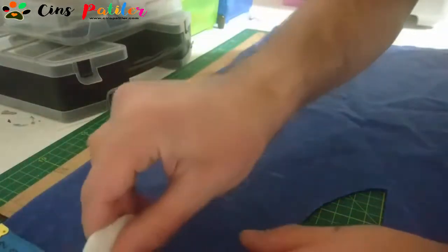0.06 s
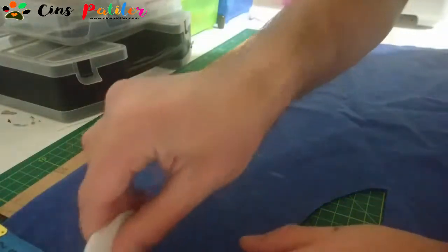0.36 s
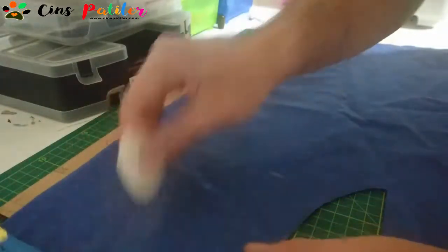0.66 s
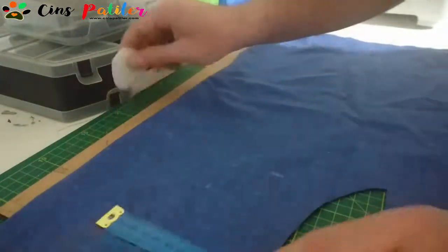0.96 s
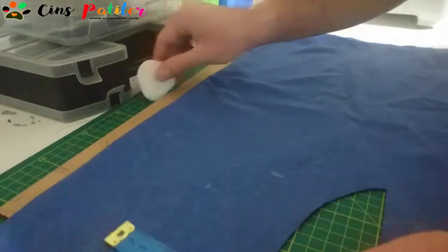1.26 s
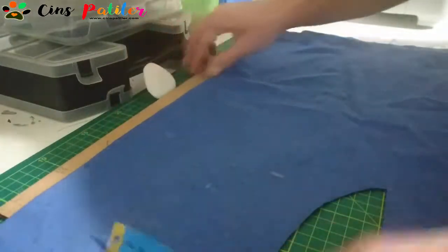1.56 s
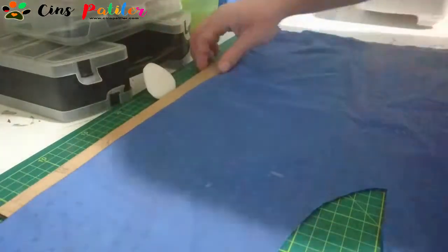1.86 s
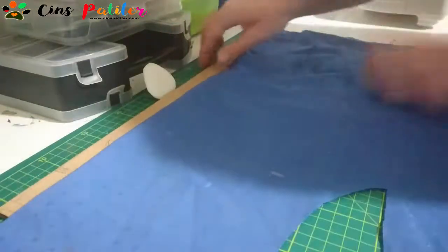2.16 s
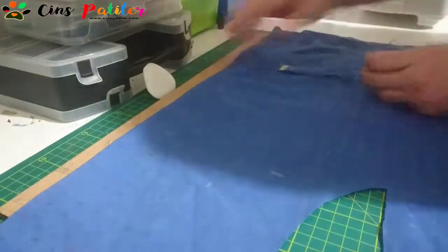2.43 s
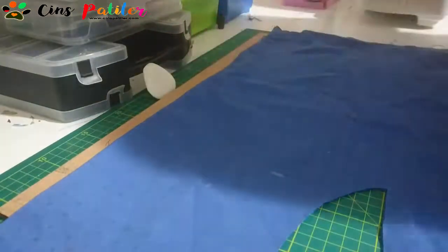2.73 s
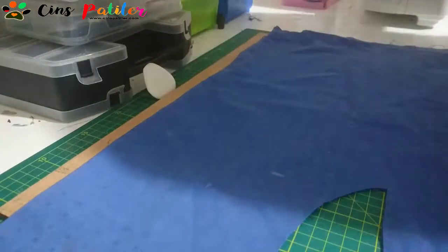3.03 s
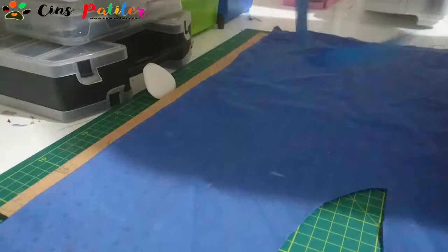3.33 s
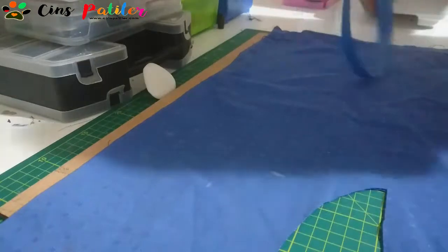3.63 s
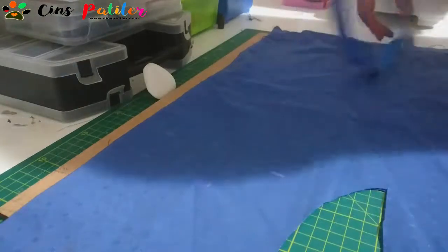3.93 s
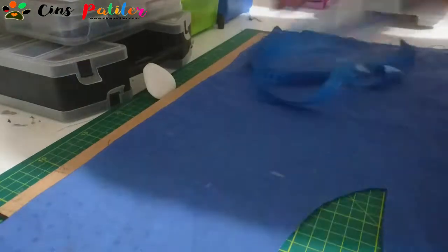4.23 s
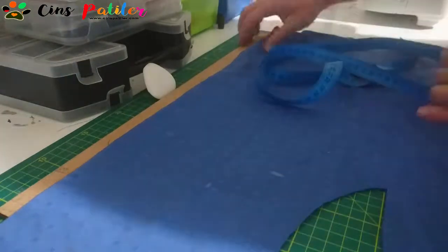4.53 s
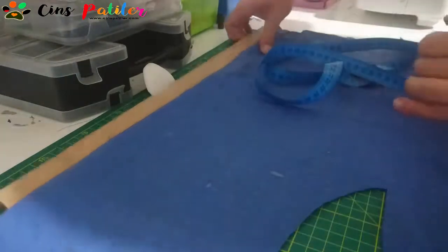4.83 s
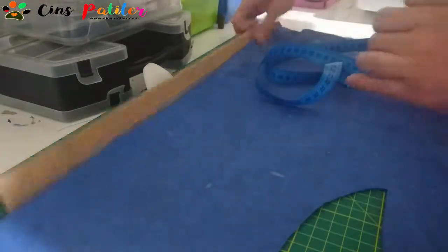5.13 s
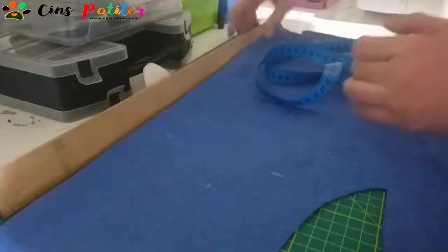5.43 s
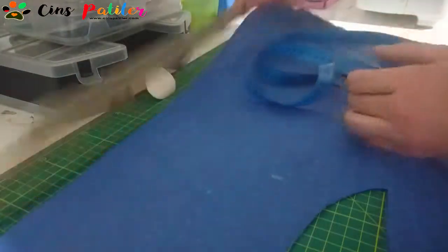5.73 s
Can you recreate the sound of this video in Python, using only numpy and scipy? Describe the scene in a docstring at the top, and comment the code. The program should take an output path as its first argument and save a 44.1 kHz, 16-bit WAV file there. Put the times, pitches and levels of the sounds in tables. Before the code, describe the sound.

Close to the microphone in a small room with a faint electrical hum, sewing tools are handled on a cloth-covered table. Soft pats and the jerky rasp of a tape measure lead to a brief, bright clatter of chalk. Fingers and nails swish across fabric, and the tape flicks with dry clicks. Near the end a wooden ruler slides and strikes the table in a quick run of loud, hollow knocks.

```python
"""Sewing preparation on a cutting mat, close to a camera's stereo microphone in a small, quiet room with a
faint mains hum. Hands pat the table; a tape measure is dragged over cloth in jerks and dropped. Tailor's
chalk is put down and rattles to rest, then hands and nails brush the fabric and the flexing tape snaps.
Last, a long wooden ruler scrapes off the mat and knocks on the table as it is lifted: the top rings."""
import sys
import numpy as np
from scipy import signal
from scipy.fft import rfft, irfft, next_fast_len
from scipy.io import wavfile
from scipy.ndimage import uniform_filter1d, map_coordinates

SR = 44100
rng = np.random.default_rng(int(sys.argv[2]) if len(sys.argv) > 2 else 0)


def unload_wav(signal):
    """Save mono or channel-first audio to the path in sys.argv[1] as 16-bit WAV at rate SR, clipped to [-1, 1]."""
    wavfile.write(
        sys.argv[1],
        SR,
        np.round(np.clip(np.atleast_2d(signal).T, -1, 1) * 32767).astype(np.int16),
    )


N = 259306
TIME = np.arange(N) / SR
HIT_TIME = TIME[:2 ** 15]  # time axis of one contact and its decay
HIT_HZ = np.fft.rfftfreq(len(HIT_TIME), 1 / SR)

# ruler and table top ringing together: (frequency [Hz], level [dB], t60 [s])
TABLE_MODES = [(66.3, -21, 0.43), (94, -5, 0.11), (104.4, 4, 0.15), (151.8, -2.5, 0.36), (257, -12, 0.13),
               (293, -4, 0.216), (358, 3.5, 0.055), (368, -36, .15), (473, -12.5, 0.2), (655, -7, 0.19),
               (855, -8.5, 0.012), (990, -20, 0.088), (1400, -3.5, 0.02), (1493, -1.5, 0.046),
               (1816, -35, 0.78)]


def ruler():
    """The ruler slides, then slaps the table edge first: the strip cracks and the top rings under it."""
    # the slide along the mat: (peak time [s], level [dB], rise [s], fade [s])
    slide = [(5.075, -40, 0.13, 0.067)]
    # wood rubbing on the mat: (frequency [Hz], level [dB])
    slide_colour = [(35, -44), (60, -14), (317, 1.5), (780, -4.5), (1050, -0.5), (1240, -11), (1390, -0.5),
                    (1630, -12), (4510, -19), (8420, -31.5), (13100, -51), (15000, -81)]
    # blows on the table: (time [s], level [dB], bass [dB], hollow middle [dB], treble [dB], crack [dB])
    knocks = [(5.1744, -25.5, 3.5, 1, -14, -50), (5.2642, -18, -5, 2.5, -24, -46),
              (5.3743, -17, -3.5, 0, -13, -39), (5.402, -21.5, -11, 0.5, -28, -59)]
    # spectrum of a blow: (frequency [Hz], level [dB])
    knock_colour = [(30, -13), (100, -13), (200, 3.5), (310, 8.5), (450, 1), (700, 2), (1000, 3.5),
                    (1450, 4), (2100, -3), (3500, 0.5), (4800, -14), (6100, -12.5), (10000, -22.5),
                    (16000, -37)]
    # the hard strip's own crack: (frequency [Hz], level [dB], t60 [s])
    crack_modes = [(3250, 1, 0.012), (3400, -12, 0.013), (3860, -1, 0.016), (6170, -9, 0.005),
                   (7440, -16, 0.004)]
    edge_lead_s, lowest_hz = 0.001208, 57.4  # the edge lands first; the deepest bass is cut from the blows
    out = strokes(slide) * friction(slide_colour, grain_db=1.5, grain_rate=600)
    for s, db, bass_db, hollow_db, treble_db, crack_db in knocks:
        colour = reshaped(knock_colour, [(310, 0), (450, hollow_db), (700, hollow_db), (1000, 0)])
        blow = pulse(colour, bass_db + 8.5, treble_db + 8.5)
        blow += amp(crack_db) * ring(crack_modes, scatter_db=4)
        slap = placed(blow, lead_ms=0.275, pan_db=-1.5, near_db=2.5, near_t60=0.018, room_db=-2)
        top = ring(TABLE_MODES, scatter_db=1)
        body = placed(top, lead_ms=0.096, pan_db=1.4, near_db=-1.5, near_t60=0.013, room_db=-28)
        edge = placed(blow, lead_ms=0.53, pan_db=0, near_db=9.5, near_t60=0.0083, room_db=-12)
        add(out, s - edge_lead_s, amp(db + 10) * edge)
        add(out, s, amp(db + 23) * slap + amp(db + bass_db - 9.5) * body)
    return signal.sosfilt(signal.butter(3, lowest_hz, "high", fs=SR, output="sos"), out)


def ruler_click():
    """The ruler's thin corner snaps off the mat with a dry, bright click."""
    # the corner lets go: (time [s], level [dB])
    clicks = [(5.0854, -24.5)]
    # its resonances: (frequency [Hz], level [dB], t60 [s])
    corner_modes = [(1760, -3.5, 0.0055), (3120, 1.5, 0.0023), (3800, -2.5, 0.01), (4520, -4.5, 0.0095),
                    (6000, -8, 0.0055), (8360, -13, 0.0036), (12000, -18, 0.0031)]
    out = np.zeros((2, N))
    for s, db in clicks:
        corner = ring(corner_modes, scatter_db=1.5)
        click = placed(corner, lead_ms=0.33, pan_db=3, near_db=-1, near_t60=0.033, room_db=-2.5)
        add(out, s, amp(db - 5.5) * click)
    return out


def ruler_drag():
    """Dry friction keeps the wooden strip ringing in its bending modes."""
    # its end drags: (peak time [s], level [dB], rise [s], fade [s])
    drags = [(5.58, -49, 0.03, 0.05), (5.695, -63.5, 0.56, 0.32)]
    # bending modes: (frequency [Hz], width [Hz], level [dB])
    bending_modes = [(632, 38, 0), (1310, 40, -18), (1868, 18, 1.5), (2550, 32, -4.5), (3100, 140, -14),
                     (3820, 58, -18), (4230, 82, -16), (4870, 71, -15), (6000, 300, -19)]

    def wood(hz):
        modes = sum((-1) ** k * amp(db) * 1j * hz * width / (centre ** 2 - hz ** 2 + 1j * hz * width)
                    for k, (centre, width, db) in enumerate(bending_modes))
        return modes / (1 + (hz / 8000) ** 4)
    slips = diffuse(N) * amp(3 * wobble(120))
    return strokes(drags) * unit(filtered(slips, wood))


def light_taps():
    """Tape, fingers and tools touch the cloth-covered table: each rings hollow and stirs the top."""
    # contacts: (time [s], level [dB], bass [dB], treble [dB], left over right [dB], resonance [Hz])
    taps = [(0.632, -57, -11, -15, 0, 1410), (0.957, -46, -26, -8.5, 14, 1330),
            (0.967, -43, 2, -8, 1, 1370), (1.029, -45.5, 2, -11, 4, 1440), (1.050, -58, 9, 2.5, -5, 1570),
            (1.122, -43, -19, -13, 1, 1640), (1.2206, -27, -4.5, -14.5, 4, 1360),
            (1.338, -53.5, -15, -4, 10, 4000), (1.796, -50.5, -8, -1, -3, 1490),
            (1.802, -44.5, -21, -6.5, 9, 1230), (1.921, -53, -1, -33, -7, 900),
            (2.112, -37, 2.5, -17, 3, 2520), (2.64, -58, -3, 1.5, -2, 1390),
            (3.4466, -45, -5, -2.5, 7, 1590), (3.593, -54, 0, 0, 4, 1680),
            (3.655, -56.5, -13, -7.5, 7, 1570), (3.881, -53.5, 2, -36, 3, 600),
            (4.0415, -51.5, 10.5, -10, 0, 1410), (4.3326, -34, -2, -12, -1.5, 1670),
            (4.4403, -45.5, 5, -7.5, -2, 488), (4.6578, -45, 8.5, -11, 3, 806),
            (4.687, -50, 8.5, -7, -2, 2600), (5.534, -45, -2, -6.5, 2, 4000)]
    # spectrum of a contact: (frequency [Hz], level [dB])
    tap_colour = [(30, -4), (120, -25.5), (300, 5.5), (600, 1.5), (1000, 0.5), (1600, -5), (2400, -5),
                  (4200, -0.5), (6000, -12.5), (10000, -16), (16000, -45)]
    out = np.zeros((2, N))
    for s, db, bass_db, treble_db, pan_db, hz in taps:
        contact = pulse(tap_colour, bass_db + 5.5, treble_db + 0.5)
        hollow = resonant(contact, hz, sharpness=1.96, boost_db=2.5)
        tap = placed(hollow, lead_ms=0.086, pan_db=pan_db, near_db=4, near_t60=0.027, room_db=4.5)
        add(out, s, amp(db + 19) * tap)
        add(out, s, amp(db + bass_db - 20.5) * ring(TABLE_MODES, scatter_db=1.5))
    return out


def chalk():
    """The hard chalk wafer pings at each bounce and knocks on what it leans against."""
    # it rocks to rest: (time [s], level [dB], knock [dB])
    bounces = [(1.3834, -28.5, -7.5), (1.3999, -29, -5), (1.422, -31, -12.5), (1.446, -53, -19),
               (1.4543, -41.5, -5), (1.4633, -49.5, 2)]
    # the wafer's resonances: (frequency [Hz], level [dB], t60 [s])
    wafer_modes = [(2470, -16.5, 0.034), (3630, -7, 0.014), (4210, -0.5, 0.038), (4240, -6, 0.028),
                   (4380, -19, 0.016), (6820, -20, .016), (8100, -17, 0.04), (8700, -27, 0.066),
                   (12900, -29, 0.033)]
    # spectrum of its knock: (frequency [Hz], level [dB])
    knock_colour = [(60, -42), (300, 8.5), (520, 1.5), (760, 10), (1100, 2), (1700, -0.5), (2400, -5),
                    (4000, -4), (5400, -15), (7000, -13.5), (9000, -14), (16000, -27)]
    out = np.zeros((2, N))
    for s, db, knock_db in bounces:
        wafer = ring(wafer_modes, scatter_db=0.8, in_step=True) * onset(0.0004)
        ping = placed(wafer, lead_ms=0.34, pan_db=5.5, near_db=-9.5, near_t60=0.022, room_db=-11.5)
        knock = placed(pulse(knock_colour), lead_ms=0.17, pan_db=0.5, near_db=0, near_t60=0.066, room_db=-4)
        add(out, s, amp(db - 1.5) * ping + amp(db + knock_db + 25) * knock)
    return out


def hand_thuds():
    """Soft hands give the padded table a low push; a flat palm pushes deeper than a fingertip. The pat at 5.087
    s is the low thump under the ruler's corner click."""
    # pats: (time [s], level [dB], depth [dB])
    pats = [(0.32, -48.5, -25), (0.433, -45.5, -5), (0.533, -46, -14), (2.211, -47, 0), (2.272, -42, -24),
            (3.893, -51.5, -12), (4.445, -46.5, 1.5), (5.087, -36, -25), (5.535, -38.5, -1),
            (5.617, -34, -44), (5.669, -36.5, -39)]
    # spectrum of a pat: (frequency [Hz], level [dB])
    pat_colour = [(25, -19), (60, -7.5), (110, 10.5), (190, -0.5), (320, -7), (600, -24.5), (2000, -34),
                  (6000, -78), (16000, -110)]
    settle_s, settle_db = 0.027, -12  # the rest of the hand follows, more softly
    out = np.zeros((2, N))
    for s, db, depth_db in pats:
        push = pulse(reshaped(pat_colour, [(70, depth_db + 11.5), (150, 0)]))
        for delay, loss_db in ((0, 0), (settle_s, settle_db)):
            thud = placed(push, lead_ms=0, pan_db=1.5, near_db=4, near_t60=0.019, room_db=0.5)
            add(out, s + delay, amp(db + loss_db + 35) * thud)
    return out


def table_rumble():
    """A hand leans on the table and the loaded top shudders deep in the bass."""
    # the lean: (peak time [s], level [dB], rise [s], fade [s])
    lean = [(2.255, -51.5, 0.043, 0.17)]
    # spectrum of the shudder: (frequency [Hz], level [dB])
    shudder_colour = [(20, -30.5), (35, -13), (55, 16), (80, -25), (140, -24), (500, -70), (2000, -100)]
    return strokes(lean) * coloured(diffuse(N), shudder_colour)


def finger_squeak():
    """A fingertip sticks and slips on the ruler: an unsteady tone, strongest at its octave."""
    # squeaks that stop dead: (start [s], stop [s], level [dB], slip rate [Hz])
    squeaks = [(1.515, 1.522, -37.5, 939)]
    out = np.zeros((2, N))
    for start, stop, db, hz in squeaks:
        phase = 2 * np.pi * hz * TIME + .3 * wobble(350)
        swell = level([(start - .008, db - 20), (start, db - 3), (stop, db), (stop + .002, db - 40)])
        tone = swell * (amp(-8) * np.sin(phase) + np.sin(2 * phase))
        first = round((start - .01) * SR)
        burst = tone[first:first + len(HIT_TIME)]
        squeak = placed(burst, lead_ms=0.033, pan_db=2, near_db=-7, near_t60=0.015, room_db=-11.5)
        add(out, first / SR, squeak)
    return out


def tape_drag():
    """The stiff tape creeps over the cloth, with short jerks that swell and stop dead."""
    # the slow creep: (time [s], level [dB])
    creep = [(0.60, -90), (0.645, -70), (0.83, -67), (1.06, -78), (1.35, -66.5)]
    # its spectrum: (frequency [Hz], level [dB])
    creep_colour = [(200, -35), (1100, -14.5), (1400, -3), (1590, -8.5), (1900, -14.5), (3000, -27),
                    (6000, -42), (16000, -60)]
    # jerks: (start [s], stop [s], final level [dB], rise [dB], treble [dB], resonance [Hz])
    jerks = [(0.879, 0.945, -50, 17.5, 12, 1580), (1.121, 1.143, -54, -3, -1.5, 1570),
             (1.16, 1.219, -48.5, 33.5, -29, 1850), (1.48, 1.52, -37.5, 16.5, 2, 1700),
             (1.54, 1.583, -55, 11, 13, 1150)]
    # their spectrum: (frequency [Hz], level [dB])
    jerk_colour = [(60, -53), (300, -1), (800, 8), (1250, 9.5), (1560, 6), (1900, 4.5), (2250, 3),
                   (4000, -3.5), (6000, -11.5), (9000, -15.5), (16000, -37)]
    out = level(creep) * friction(creep_colour, grain_db=1, grain_rate=300)
    for start, stop, db, rise_db, treble_db, hz in jerks:
        swell = level([(start - .01, db - rise_db - 23), (start, db - rise_db), (stop - .005, db),
                       (stop + .011, db - 17.5), (stop + .18, db - 44)])
        rub = friction(jerk_colour, grain_db=1.5, grain_rate=600)
        rub = filtered(rub, lambda f: amp(along([(1900, 0), (3600, treble_db)], f)))
        out += swell * unit(resonant(rub, hz, sharpness=10, boost_db=8.5))
    return out


def tape_snaps():
    """The flexing tape flicks straight with a dry, bright snap."""
    # flicks: (time [s], level [dB], body [dB])
    flicks = [(3.4447, -34, -3), (4.0415, -52.5, 4), (4.043, -44.5, -11), (4.059, -60, -1),
              (4.291, -52, -6), (4.313, -46, 4)]
    # spectrum of a snap: (frequency [Hz], level [dB])
    snap_colour = [(60, -28), (300, 3.5), (700, -4), (1500, 0), (3300, -0.5), (4200, 4.5), (5200, -1.5),
                   (7000, -4.5), (9600, -4), (11000, -10.5), (13000, -8), (16000, -33)]
    out = np.zeros((2, N))
    for s, db, body_db in flicks:
        click = pulse(reshaped(snap_colour, [(2000, body_db), (5000, 0)]))
        snap = placed(click, lead_ms=0.018, pan_db=-2.5, near_db=3.5, near_t60=0.02, room_db=2.5)
        add(out, s, amp(db + 10) * snap)
    return out


def tape_chirps():
    """The tape catches on the cloth and one resonance rings: a short, soft-edged, hollow chirp."""
    # catches: (time [s], level [dB], pitch [Hz])
    catches = [(0.788, -55.5, 1580), (1.030, -50.5, 1590), (1.049, -55, 1600), (1.119, -44.5, 1594)]
    attack_s, t60 = 0.002, 0.027
    out = np.zeros((2, N))
    for s, db, hz in catches:
        tone = ring([(hz, 0, t60)], scatter_db=0.5) * onset(attack_s)
        chirp = placed(tone, lead_ms=0.067, pan_db=-5, near_db=-13, near_t60=0.024, room_db=-1)
        add(out, s, amp(db + 5) * chirp)
    return out


def fabric():
    """The weave hisses when brushed; hands rub more dully through it on the mat."""
    # light swishes: (peak time [s], level [dB], rise [s], fade [s])
    swishes = [(0.382, -65, 0.0073, 0.06), (0.635, -65, 0.015, 0.033), (0.79, -63.5, 0.22, 0.34),
               (1.19, -64, 0.081, 0.11), (1.62, -69, 0.37, 0.245), (1.74, -56, 0.052, 0.11),
               (1.805, -74, 0.02, 0.04), (1.86, -63.5, 0.12, 0.13), (2.08, -73, 0.94, 0.68),
               (3.6, -73, 0.24, 0.29), (4.225, -67.5, 0.039, 0.032), (4.29, -69.5, 0.15, 0.23),
               (4.70, -70.5, 0.025, 0.12), (4.84, -67, 0.021, 0.1), (5.078, -58.5, 0.047, 0.35),
               (5.58, -70, 0.068, 0.49)]
    # their spectrum: (frequency [Hz], level [dB])
    swish_colour = [(300, -42), (1800, -3.5), (2800, 1), (3600, 5), (4150, 7.5), (5000, 0.5), (8000, 4),
                    (11000, -6), (14000, -10), (16000, -36)]
    # spectrum of the broad brushes: (frequency [Hz], level [dB])
    brush_colour = [(300, -12), (1700, -10), (2800, -8), (4100, -3), (5500, -3.5), (8000, -2),
                    (11000, -5.5), (14000, -7), (16000, -15)]
    # hand rubs: (peak time [s], level [dB], rise [s], fade [s])
    rubs = [(1.18, -64, 0.38, 0.27), (1.485, -54, 0.5, 0.34), (2.22, -62, 1.24, 0.39),
            (3.63, -65, 0.43, 0.23), (4.47, -69, 0.45, 0.81), (4.72, -62, 0.27, 0.14),
            (5.19, -48, 0.42, 0.21), (5.31, -42, 0.12, 0.11), (5.54, -51.5, 0.16, 0.38),
            (5.63, -57, 0.046, 0.081), (5.69, -60, 0.054, 0.054)]
    # their spectrum: (frequency [Hz], level [dB])
    rub_colour = [(40, -12), (120, -2), (350, -1), (600, -6.5), (1200, -11.5), (2500, -19), (6000, -26.5),
                  (16000, -87)]
    swish = patchy(friction(swish_colour, grain_db=1.2, grain_rate=450), depth_db=.7)
    brush = patchy(friction(brush_colour, grain_db=2.6, grain_rate=500), depth_db=2.2)
    rub = friction(rub_colour, grain_db=3.5, grain_rate=100)
    return strokes(swishes) * swish + brush_gain() * brush + strokes(rubs) * rub


def brush_gain():
    """Gain per sample of broad brushes across the fabric: a quick attack, a steady swell, a release."""
    # brushes: (start [s], stop [s], final level [dB], rise [dB])
    brushes = [(2.667, 2.784, -54.5, 11), (2.825, 3.003, -59.5, 2)]
    attack_db_per_s, release_db_per_s = 448, 212
    gain = np.zeros(N)
    for start, stop, db, rise_db in brushes:
        swell_db = np.interp(TIME, [start, stop], [db - rise_db, db])
        attack_db = attack_db_per_s * np.maximum(start - TIME, 0)
        release_db = release_db_per_s * np.maximum(TIME - stop, 0)
        gain = np.maximum(gain, amp(swell_db - attack_db - release_db))
    return gain


def nail_zips():
    """Nails tick over the threads so fast that they rasp at a pitch, which glides with their speed."""
    # zips: (start [s], stop [s], level [dB], first pitch [Hz], last pitch [Hz])
    zips = [(2.656, 2.822, -64.5, 4340, 3770), (2.753, 2.822, -64.5, 3220, 2980),
            (2.85, 2.907, -70, 2870, 2680), (2.887, 2.94, -71, 3530, 3390), (2.907, 2.97, -65, 4260, 4270)]
    spread_hz, slip_db = 700, 1.5  # spread of the thread rate; depth of catch and slip
    out = np.zeros((2, N))
    for start, stop, db, first_hz, last_hz in zips:
        progress = np.clip((TIME - start) / (stop - start), 0, 1)
        phase = 2 * np.pi * np.cumsum(first_hz + (last_hz - first_hz) * progress) / SR
        uneven = filtered(diffuse(N), lambda hz: 1 / (1 + (hz / spread_hz) ** 2))
        rasp = unit(uneven * np.sin(phase) * amp(slip_db * wobble(250)))
        out += amp(db) * np.sin(np.pi * progress) * rasp
    return out


def room_tone():
    """The small room's still air and an unsteady mains hum."""
    # spectrum of the air: (frequency [Hz], level [dB])
    air_colour = [(12, -35), (20, -16), (49, -15), (119, -8), (219, -16.5), (393, -13.5), (597, -21),
                  (767, -18.5), (932, -24), (2600, -31), (4200, -36), (9390, -37.5), (10800, -44),
                  (12100, -39.5), (15500, -62)]
    # tones of the hum: (frequency [Hz], level [dB])
    hum_tones = [(118.4, -67.5), (393.0, -75), (484.5, -85.5)]
    air = coloured(diffuse(N), air_colour)
    hum = sum(amp(db + 1.5 * wobble(9)) * np.sqrt(2) * np.sin(2 * np.pi * hz * TIME + .6 * wobble(14))
              for hz, db in hum_tones)
    return amp(-67) * air + amp(-2.5) * hum


def placed(sound, lead_ms, pan_db, near_db, near_t60, room_db):
    """Direct sound at the microphone pair, scatter from boxes nearby, two walls, then the room's tail."""
    # first reflections off the walls: (delay [s], level [dB])
    reflections = [(0.017, -2), (0.0231, -4.5)]
    # the room's decay: (frequency [Hz], t60 [s])
    room_decay = [(100, 0.49), (400, 0.28), (1500, 0.23), (5000, 0.24), (14000, 0.37)]
    size = len(HIT_TIME)
    side = np.array([[.5], [-.5]])  # left, right
    delay_s = (abs(lead_ms) / 2 - side * lead_ms) / 1000
    direct = amp(side * pan_db) * np.exp(-2j * np.pi * HIT_HZ * delay_s)
    walls = sum(amp(db - 3) * np.exp(-2j * np.pi * HIT_HZ * delay) for delay, db in reflections)
    walls /= (1 + 1j * HIT_HZ / 500) ** 2  # cluttered walls mirror only the long waves
    near = diffuse(size) * amp(-60 * HIT_TIME / near_t60)
    near = signal.lfilter(*signal.butter(1, 500, "high", fs=SR), near)  # boxes scatter only short waves
    hz, t, spectra = signal.stft(diffuse(size), SR, nperseg=256)
    spectra *= amp(-60 * t / along(room_decay, hz)[:, None])
    tail = signal.istft(spectra, SR, nperseg=256)[1][:, :size] * onset(0.0014)
    echoes = (amp(near_db + side * pan_db) * unit(near) + amp(room_db) * unit(tail)) / np.sqrt(size)
    early = irfft(rfft(sound) * (direct + walls))
    return early + signal.fftconvolve(sound[None], echoes, axes=1)[:, :size]


def diffuse(size):
    """White noise from all sides: the two microphones agree only in the bass."""
    # likeness of left and right: (frequency [Hz], correlation [0-1])
    likeness = [(100, 0.81), (300, 0.86), (600, 0.22), (1200, 0.025), (3000, 0.022), (10000, 0.041)]

    def mid_and_side(hz):
        turn = np.arccos(np.clip(along(likeness, hz), -1, 1)) / 2
        return np.array([np.cos(turn), np.sin(turn)])
    mid, side = filtered(rng.standard_normal((2, size)), mid_and_side)
    return unit(np.array([mid + side, mid - side]))


def friction(colour, grain_db, grain_rate):
    """Rubbing noise of rms 1, broken into grains as fibres catch and slip."""
    return coloured(diffuse(N) * amp(grain_db * wobble(grain_rate)), colour)


def strokes(rows):
    """Gain per sample of rubbing strokes: each swells to its peak and dies away, and their powers add."""
    range_db = 23.5  # gained over the rise time, lost over the fade time
    power = np.zeros(N)
    for s, db, rise_s, fade_s in rows:
        away = np.maximum((s - TIME) / rise_s, (TIME - s) / fade_s)
        power += amp(db - range_db * away) ** 2
    return np.sqrt(power)


def patchy(x, depth_db):
    """Brief patches of colour, as folds of cloth open and close."""
    spectra = signal.stft(x, nperseg=512)[2]
    patches = uniform_filter1d(rng.standard_normal(spectra.shape[1:]), size=8, axis=0)
    patches = uniform_filter1d(patches, size=7, axis=1)
    return unit(signal.istft(spectra * amp(depth_db * unit(patches)), nperseg=512)[1][:, :N])


def pulse(colour, bass_db=0, treble_db=0):
    """A minimum-phase contact pulse: heavier blows hold more bass, harder ones more treble."""
    shelves = [(280, bass_db), (650, 0), (1900, 0), (3600, treble_db)]
    cepstrum = irfft(np.log(amp(along(colour, HIT_HZ) + along(shelves, HIT_HZ))))
    half = len(cepstrum) // 2
    cepstrum[1:half] *= 2
    cepstrum[half + 1:] = 0
    return irfft(np.exp(rfft(cepstrum)))


def ring(modes, scatter_db, in_step=False):
    """Damped modes, struck at new strengths each time; starting in step gives a sharper attack."""
    sign = 1 if in_step else -1
    out = np.zeros(len(HIT_TIME))
    for k, (hz, db, t60) in enumerate(modes):
        decay = amp(db + scatter_db * rng.standard_normal() - 60 * HIT_TIME / t60)
        out += sign ** k * decay * np.sin(2 * np.pi * hz * HIT_TIME)
    return out


def resonant(x, hz, sharpness, boost_db):
    """x with one ringing resonance added."""
    return x + amp(boost_db) * signal.lfilter(*signal.iirpeak(hz, sharpness, SR), x)


def balanced(x, balance):
    """Share each frequency's power between the two sides by (Hz, left over right dB) points."""
    def gains(hz):
        pair = amp(np.array([[.5], [-.5]]) * along(balance, hz))
        return pair / np.sqrt(np.mean(pair ** 2, axis=0))
    return filtered(x, gains)


def coloured(x, colour):
    """x shaped by (Hz, dB) points, at rms 1."""
    return unit(filtered(x, lambda hz: amp(along(colour, hz))))


def reshaped(colour, curve):
    """(Hz, dB) points with a second such curve added."""
    return [(hz, db + along(curve, hz)) for hz, db in colour]


def filtered(x, response):
    """x through a response given as a function of frequency."""
    size = x.shape[-1]
    padded = next_fast_len(size + SR // 4)
    return irfft(rfft(x, padded) * response(np.fft.rfftfreq(padded, 1 / SR)), padded)[..., :size]


def along(points, hz):
    """Read (Hz, value) points on a log axis."""
    knots_hz, values = np.transpose(points)
    return np.interp(np.log(hz + 1), np.log(knots_hz + 1), values)


def level(rows):
    """Gain per sample from (s, dB) rows, silent outside them."""
    s, db = np.transpose(rows)
    return amp(np.interp(TIME, s, db, left=-120, right=-120))


def onset(attack_s):
    """Gain that softens the start of a contact."""
    return 1 - np.exp(-HIT_TIME / attack_s)


def wobble(rate):
    """A smooth random curve, rate knots a second."""
    return map_coordinates(rng.standard_normal(int(N * rate / SR) + 4), [TIME * rate])


def add(track, s, sound):
    """Mix a sound into the track at time s."""
    part = track[:, round(s * SR):][:, :sound.shape[-1]]
    part += sound[..., :part.shape[-1]]


def amp(db):
    """Decibels to gain."""
    return 10 ** (np.asarray(db) / 20)


def unit(x):
    """Scale to rms 1."""
    return x / np.sqrt(np.mean(x ** 2) + 1e-20)


def scene():
    """The cutting table close ahead of two unlike microphone ports; cloth and tape lie to the right."""
    # the camera shades its left port from the right: (frequency [Hz], left over right [dB])
    camera_shadow = [(2000, 0.7), (4100, 0), (6000, -7.5), (9500, -9.5), (12000, -6), (15000, -5)]
    # each port has its own resonances: (frequency [Hz], left over right [dB])
    port_balance = [(120, 1.5), (300, -2), (600, -2), (1200, -1.2), (2000, -0.5), (3000, 3.5), (4100, 15.5),
                    (4600, 9.5), (5600, 2.5), (9000, -2.5), (11500, 2.5), (15000, 3)]
    ahead = ruler() + ruler_click() + ruler_drag()
    ahead += light_taps() + hand_thuds() + table_rumble() + chalk() + finger_squeak()
    right = tape_snaps() + tape_chirps() + tape_drag() + fabric() + nail_zips()
    return balanced(ahead + balanced(right, camera_shadow), port_balance) + room_tone()


def record(dry):
    """The camera rolls off the deepest bass and keeps nothing above its band limit."""
    low_hz, top_hz = 42, 15750
    low_cut = signal.butter(3, low_hz, "high", fs=SR, output="sos")
    return filtered(signal.sosfilt(low_cut, dry), lambda hz: hz < top_hz)


dry = scene()
out = record(dry)
unload_wav(out)
```